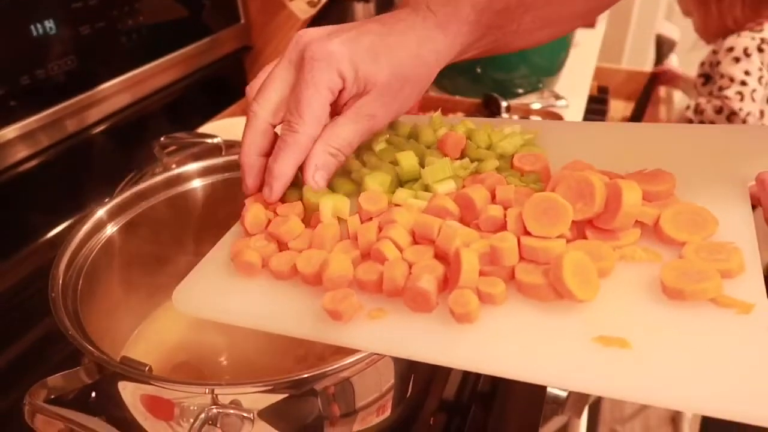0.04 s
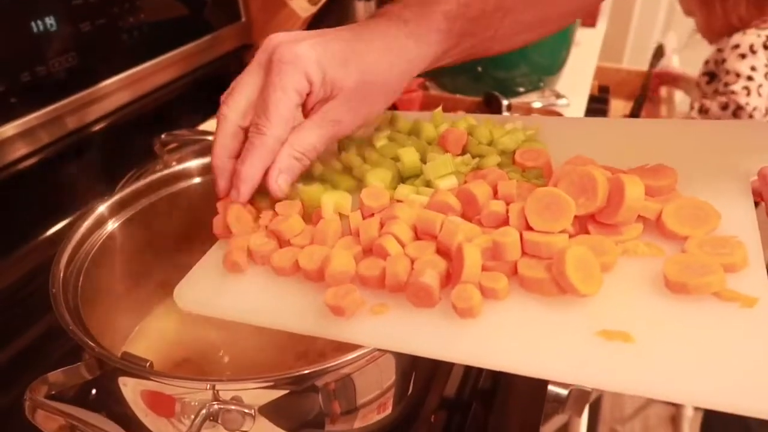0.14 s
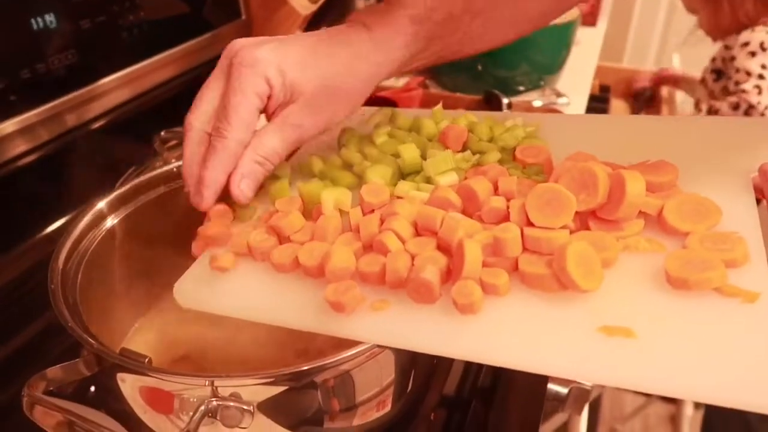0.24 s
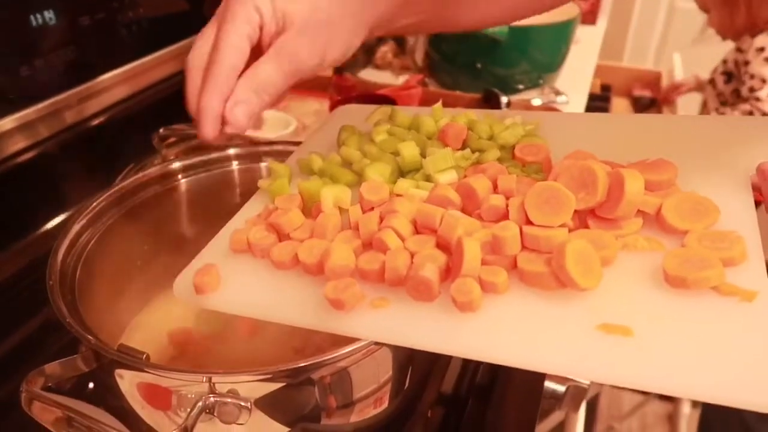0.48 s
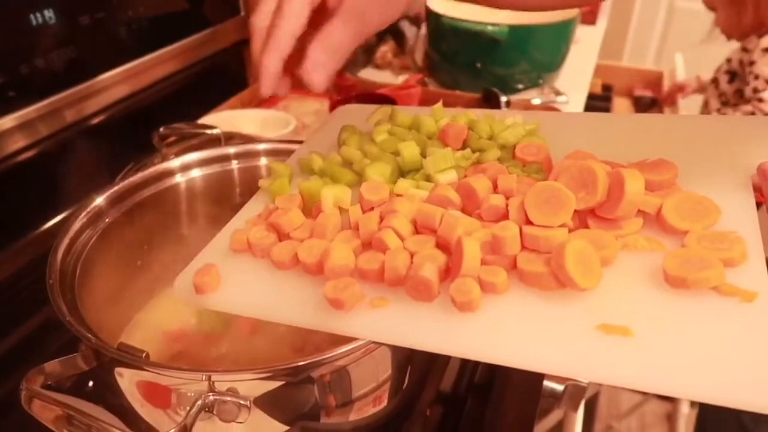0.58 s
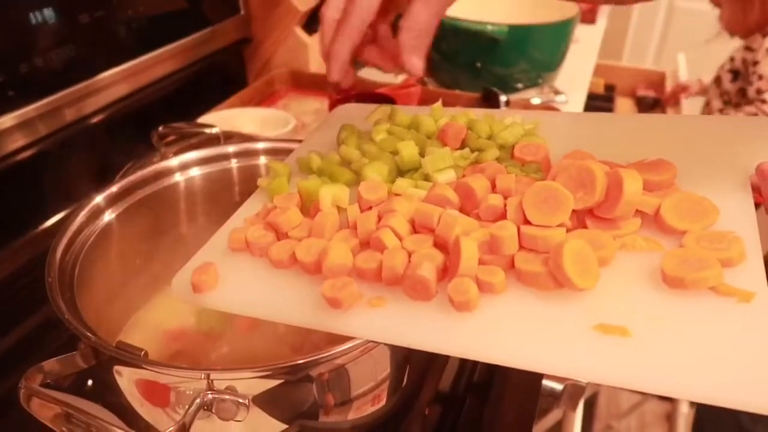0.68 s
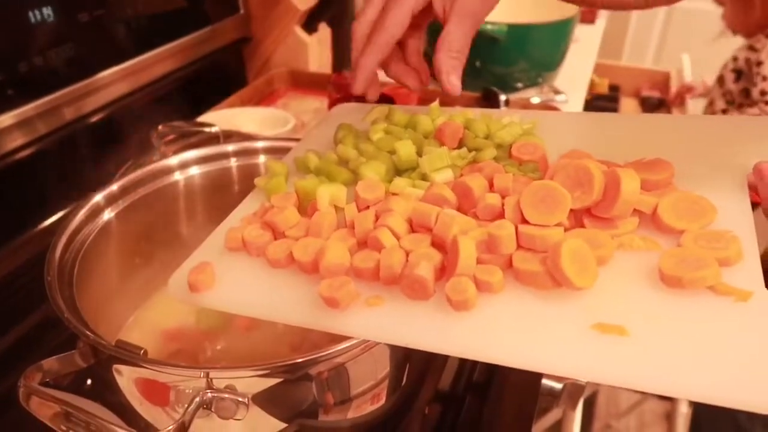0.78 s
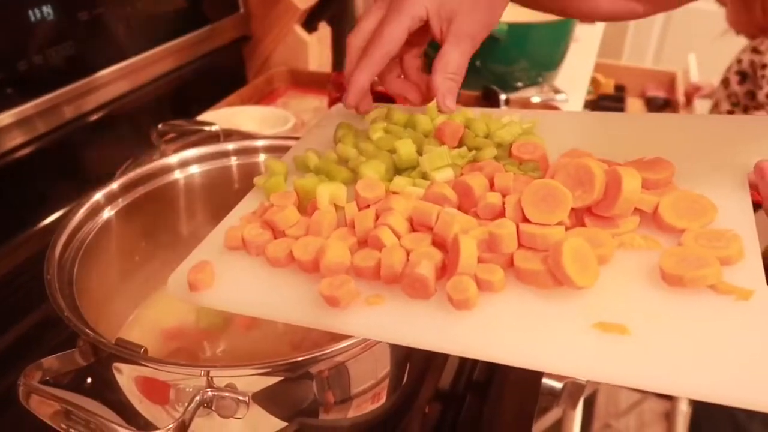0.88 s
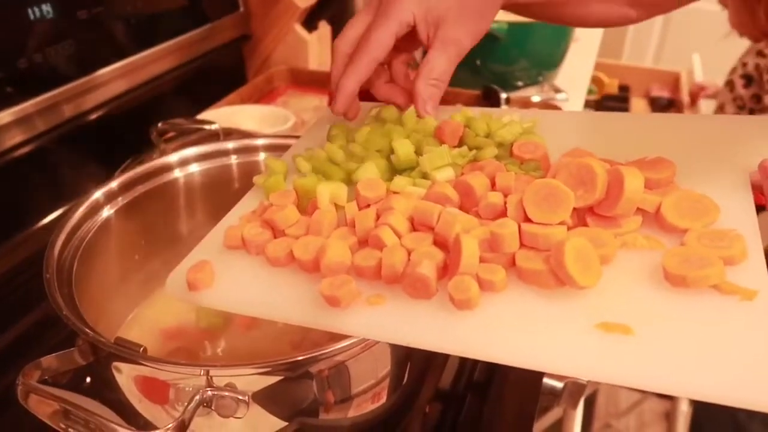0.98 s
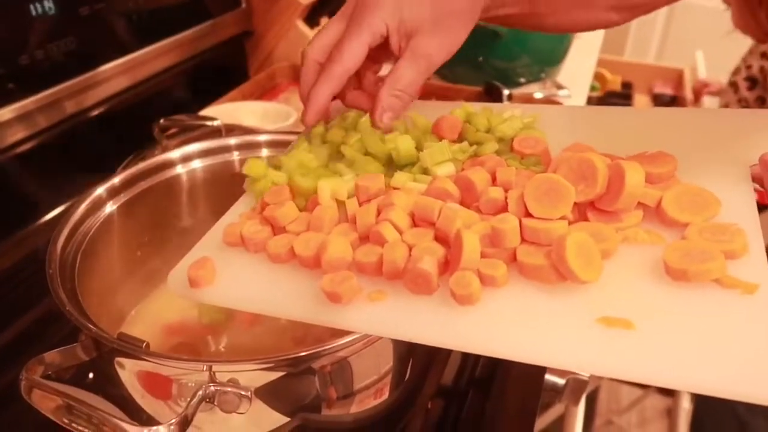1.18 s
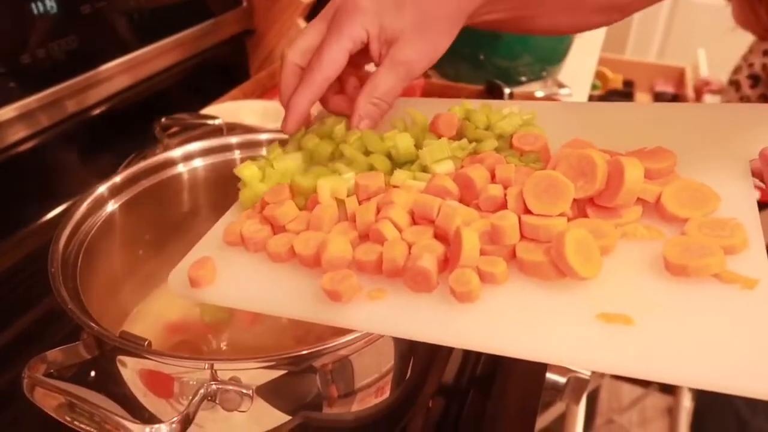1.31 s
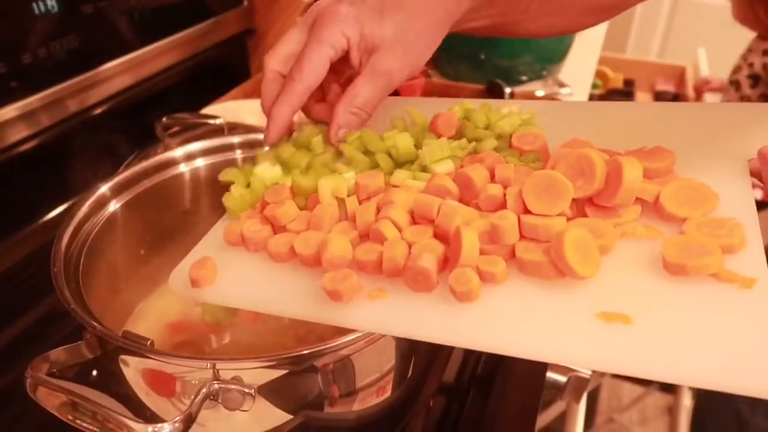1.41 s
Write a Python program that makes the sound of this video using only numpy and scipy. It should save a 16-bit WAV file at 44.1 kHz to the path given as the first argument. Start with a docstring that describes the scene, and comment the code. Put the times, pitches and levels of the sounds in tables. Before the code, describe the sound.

A loud hard knock in a steel pot as chopped vegetables are scraped along a plastic board

```python
"""A large piece of vegetable knocks loudly in a steel pot: damped modes, a noisy crack and a room echo, overloaded.
Fingers push chopped carrot and celery along a plastic cutting board held over the pot: clumped noise
through the board's resonances gives the rubbing, decaying sine blips the tumbling pieces.
Dull noise bumps of the hand, faint ticks of moist pieces and the ring of the stove top join in,
over shaped noise for the kitchen air and two sines for a low hum."""
import sys
import numpy as np
from scipy import signal
from scipy.fft import rfft, irfft, next_fast_len
from scipy.io import wavfile
from scipy.ndimage import map_coordinates

SR = 44100
rng = np.random.default_rng(int(sys.argv[2]) if len(sys.argv) > 2 else 0)


def transcribe(signal):
    """Save signal, clipped to [-1, 1], as a 16-bit WAV file at the path in sys.argv[1]."""
    frames = np.atleast_2d(signal).T
    limited = np.clip(frames, -1, 1)
    pcm = np.round(limited * 32767).astype(np.int16)
    wavfile.write(sys.argv[1], SR, pcm)


N = 63945  # length in samples

# Spectrum of the kitchen air. Each row: frequency in Hz, relative density in dB per Hz.
AIR_SPECTRUM = [(20, -8), (60, -3), (120, -2), (230, -2), (480, -3), (850, -15), (1060, -8), (1450, -15),
                (2200, -16), (5000, -29.5), (10000, -44), (16000, -68)]
# Stereo difference in the air. Each row: frequency in Hz, side gain in dB.
AIR_SIDE_GAIN = [(30, -13), (120, -11.5), (500, -3.5), (2000, -3), (8000, 6)]
# Steady tones of the hum. Each row: frequency in Hz, rms level in dB.
HUM_TONES = [(60, -69), (122, -64.5)]
AIR_DB = -57.5

# Reverberation of the kitchen. Each row: frequency in Hz, decay time t60 in s.
ROOM_DECAY = [(100, .45), (500, .48), (1500, .45), (4000, .39), (8000, .29), (14000, .18)]
# Stereo difference in the echo. Each row: frequency in Hz, side gain in dB.
ROOM_SIDE_GAIN = [(100, -20), (300, -20), (1000, -23), (2000, -22.5), (4000, -4), (10000, -2)]
ROOM_BUILD_S = 0.00061
POT_WET_DB, RING_WET_DB, BOARD_WET_DB = -5, -42, -9  # sends of the sources into the room

# Dull bumps of the hand on the board. Each row: start in seconds, level in dB.
HAND_BUMPS = [(.012, -40.5), (.054, -36.5), (.095, -36.5), (.135, -41), (.272, -33), (.385, -43.5),
              (.83, -46), (1.22, -47), (1.27, -50), (1.335, -45.5), (1.41, -45)]
# Spectrum of a bump. Each row: frequency in Hz, relative gain in dB.
BUMP_SPECTRUM = [(30, -18), (70, -7), (115, 8.5), (170, -11.5), (330, -15), (700, -21), (3000, -48.5)]
BUMP_T60_S, BUMP_ATTACK_S = 0.11, 0.0029

# Wet ticks of pieces coming unstuck. Each row: start in seconds, level in dB, pitch in Hz.
WET_TICKS = [(.006, -37.5, 3200), (.583, -67, 4900), (0.765, -60.5, 5266), (.834, -63.5, 4800),
             (.904, -58, 5160), (.911, -55, 3000), (0.914, -48.5, 1700), (1.006, -56, 8000)]
TICK_T60_S, TICK_ATTACK_S, TICK_WIDTH_OCT = 0.03, 0.00081, 0.25

# Resonances of the board. Each row: centre in Hz, width in Hz, relative gain in dB.
BOARD_RESONANCES = [(109, 41, -6.5), (228, 154, -1.5), (493, 243, -3), (665, 160, -9), (870, 1600, -16.5),
                    (1065, 165, -2.5), (1670, 480, -14), (2210, 310, -17), (3400, 1920, -26),
                    (6330, 8700, -35)]
# Sliding of the heap. Each row: time in seconds, drive level in dB.
SLIDE_LEVEL = [(0, -37), (.07, -43.5), (.16, -43), (.23, -40), (0.352, -47), (0.599, -54.5), (0.719, -53),
               (.8, -55), (.95, -53.5), (1.1, -52.5), (1.2, -53.5), (1.32, -50), (1.45, -50)]
# Pieces tumbling on the board. Each row: start in seconds, level in dB before TUMBLE_DB, pitch in Hz.
TUMBLING_PIECES = [(.001, -31.5, 807), (.005, -29.5, 1206), (.012, -29, 912), (0.021, -35, 767),
                   (0.055, -35, 293), (0.137, -48, 986), (0.196, -31.5, 445), (0.199, -36.5, 1082),
                   (.847, -48, 1120), (0.888, -46, 1054), (0.939, -48, 1065), (0.977, -47, 1130),
                   (1.031, -39.5, 525), (1.04, -49, 1116), (1.062, -41, 473), (1.11, -44.5, 1140),
                   (1.111, -53, 1712), (1.157, -49.5, 1050), (1.218, -43, 500), (1.254, -42, 1106),
                   (1.262, -40, 453), (1.2651, -44, 1080), (1.304, -49.5, 1608), (1.323, -46, 1070),
                   (1.336, -42.5, 490), (1.344, -52.5, 1670), (1.404, -51, 1690), (1.405, -40.5, 437),
                   (1.412, -38.5, 543), (1.426, -41, 403), (1.435, -38.5, 476), (1.44, -44.5, 1096)]
SLIP_SPREAD, SLIP_CLUMP_DB, SLIP_CLUMPS_PER_S = 0.5, 2.2, 75
TUMBLE_DB, TUMBLE_T60_S, TUMBLE_ATTACK_S = 4.5, 0.052, 0.0016
TUMBLE_RUB_DB = -20.5  # noise force relative to the blip's envelope

# Modes of the stove top under the pot. Each row: frequency in Hz, relative level in dB, t60 in s.
STOVE_MODES = [(280.7, -28, 0.48), (486, -29.5, 0.41), (624.4, -27.5, 0.54), (655, -39.5, 0.52),
               (785.4, -28.5, 0.48), (1019, -37.5, 0.75), (1095, -28, 0.12), (1352, -25, 0.44),
               (1578, -41, 0.45), (2310, -45, 0.88)]
# Blended radiation of the pot into the room. Each row: frequency in Hz, relative gain in dB.
POT_RADIATION = [(60, -29), (180, -21), (290, -6), (620, -1), (900, -1.5), (1400, -3), (2000, -6.5),
                 (2900, -14.5), (4200, -21), (8000, -33), (9500, -46), (15000, -66)]
RADIATED_DB = 31.5

# Contacts with the pot: a soft piece, then the graze, blow and dying rebounds of a large one.
# Each row: start in seconds, level in dB, sharp crack in dB relative to that level.
POT_CONTACTS = [(.001, -29, -6), (0.2427, -22, 1), (0.2487, 0, 22), (0.2548, -15, -3), (0.2576, -15, 22),
                (.2662, -21, 16), (.2805, -26.5, 6), (.349, -31.5, -6)]
# Modes of the pot, damped by its contents. Each row: frequency in Hz, relative level in dB, t60 in s.
POT_MODES = [(358, -19, 0.057), (495, -9.5, 0.066), (690, -11.5, 0.064), (733, -7.5, 0.11), (836, 3, 0.028),
             (980, 2.8, 0.019), (1151, -8, .07), (1272, -1, 0.028), (1567, 1.5, 0.025), (1691, -5, 0.05),
             (1782, 0, 0.017), (1977, -5, 0.036), (2240, -11, 0.025), (2710, -18, 0.072)]
# Spectrum of crack and spatter. Each row: frequency in Hz, gain in dB.
CONTACT_SPECTRUM = [(30, -14), (120, -13), (500, -4), (1800, 0), (3000, -3.5), (5000, -1.5), (8000, -8.5),
                    (9200, -24), (12000, -33), (16000, -58)]
POT_ATTACK_S = 0.0004
SPATTER_DB, SPATTER_T60_S = -3.5, 0.021
THUMP_DB, THUMP_S = -7, 0.0008

POT_LEAD_MS, BOARD_LEAD_MS = -0.02, 0.04  # how much sooner the left microphone port hears each
CLIP_TOP, TOP_HZ = 1.0, 16200  # overload ceiling (full scale = 1), band limit in Hz


def amp(db):
    """The decibel law: 20 dB is a tenfold gain."""
    return 10 ** (np.asarray(db) / 20)


def unit(x):
    """Normalisation to unit rms."""
    return x / np.sqrt(np.mean(x ** 2) + 1e-20)


def along(points, hz):
    """Interpolation of (Hz, value) points on a logarithmic frequency axis."""
    f, value = np.transpose(points)
    return np.interp(np.log(hz + 1), np.log(f + 1), value)


def since(s):
    """Elapsed time: seconds since time s, zero before it."""
    return np.maximum(np.arange(N) / SR - s, 0)


def fade(t, t60):
    """Exponential decay: 60 dB lost in each t60 from t = 0."""
    return (t >= 0) * np.exp(-np.log(1000) * np.maximum(t, 0) / t60)


def bursts(events, t60, attack):
    """Superposed envelopes of (s, dB) events that rise quickly and decay exponentially."""
    envelope = np.zeros(N)
    for s, db in events:
        t = since(s)
        envelope += amp(db) * fade(t, t60) * (1 - np.exp(-t / attack))
    return envelope


def ring(modes, t):
    """Modal superposition: damped sines (Hz, dB, t60 s) struck at t = 0."""
    return sum(amp(db) * fade(t, t60) * np.sin(2 * np.pi * hz * t) for hz, db, t60 in modes)


def filtered(x, response):
    """Linear filtering: the spectrum of x times a complex response of frequency."""
    m = 2 * next_fast_len(N // 2 + SR // 8, True)  # zero padding leaves room for the filter's tail
    hz = np.fft.rfftfreq(m, 1 / SR)
    return irfft(rfft(x, m) * response(hz), m)[..., :N]


def causal(gain):
    """Minimum phase from gain alone, by folding the real cepstrum."""
    cepstrum = irfft(np.log(gain + 1e-6))
    half = len(cepstrum) // 2
    folded = np.concatenate([cepstrum[:1], 2 * cepstrum[1:half], np.zeros(half)])
    return np.exp(rfft(folded))


def coloured(x, points):
    """Causal spectral shaping through (Hz, dB) points."""
    return filtered(x, lambda hz: causal(amp(along(points, hz))))


def ports(x, lead_ms):
    """Interaural-style delay: sound reaches two close microphone ports slightly out of step."""
    halves = np.array([[1], [-1]])  # left advanced, right delayed by half the lead
    return filtered(x, lambda hz: np.exp(1j * np.pi * hz * lead_ms / 1000 * halves))


def background():
    """Stationary sound: shaped noise of the kitchen air and the steady sines of a low hum."""
    t = np.arange(N) / SR
    mid, side = unit(coloured(rng.standard_normal((2, N)), AIR_SPECTRUM))
    side = coloured(side, AIR_SIDE_GAIN)
    hum = sum(np.sqrt(2) * amp(db) * np.sin(2 * np.pi * (hz * t + rng.random())) for hz, db in HUM_TONES)
    return amp(AIR_DB) * np.array([mid + side, mid - side]) + hum


def kitchen(x):
    """Diffuse reverberation: convolution with a stereo noise tail whose treble dies first."""
    hz, t, bins = signal.stft(rng.standard_normal((2, N)), SR, nperseg=256)
    decay = fade(t, along(ROOM_DECAY, hz)[:, None])
    build = 1 - np.exp(-t / ROOM_BUILD_S)
    tail = signal.istft(bins * decay * build, SR)[1][:, :N]
    tail = tail / np.linalg.norm(tail[0])
    mid, side = signal.fftconvolve(x[None], tail, axes=1)[:, :N]
    side = coloured(side, ROOM_SIDE_GAIN)
    return np.array([mid + side, mid - side])


def hand():
    """Heavily damped impact: the hand nudges the board in low noise thuds without ring."""
    thud = unit(coloured(rng.standard_normal(N), BUMP_SPECTRUM))
    return bursts(HAND_BUMPS, BUMP_T60_S, BUMP_ATTACK_S) * thud


def ticks():
    """Sudden release of adhesion: moist cut faces part in faint ticks of narrow-band noise."""
    out = np.zeros(N)
    for s, db, pitch in WET_TICKS:
        def band(hz):
            """Gaussian selectivity in octaves about the pitch."""
            return np.exp(-0.5 * (np.log2((hz + 1) / pitch) / TICK_WIDTH_OCT) ** 2)
        fizz = unit(filtered(rng.standard_normal(N), band))
        out += bursts([(s, db)], TICK_T60_S, TICK_ATTACK_S) * fizz
    return out


def board_response(hz):
    """Resonance: power sum of the board's broad, steep-sided peaks, scaled to unit power gain."""
    power = np.zeros(len(hz))
    for centre, width, db in BOARD_RESONANCES:
        damping = (hz * width) ** 2
        peak = damping / ((centre ** 2 - hz ** 2) ** 2 + damping)
        power += (amp(db) * peak) ** 2
    return causal(unit(np.sqrt(power)))


def board():
    """Frictional excitation: clumped slips and brief rubs drive the board; pitched blips add to it."""
    t = np.arange(N) / SR
    knots = rng.standard_normal(int(t[-1] * SLIP_CLUMPS_PER_S) + 2)
    clumps = map_coordinates(knots, [t * SLIP_CLUMPS_PER_S])  # smooth random level
    spread = np.exp(SLIP_SPREAD * rng.standard_normal(N))  # uneven slip sizes
    slips = unit(rng.standard_normal(N) * spread * amp(SLIP_CLUMP_DB * clumps))
    force = slips * amp(np.interp(t, *np.transpose(SLIDE_LEVEL)))
    blips = np.zeros(N)
    for s, db, hz in TUMBLING_PIECES:
        touch = bursts([(s, db + TUMBLE_DB)], TUMBLE_T60_S, TUMBLE_ATTACK_S)
        blips += touch * np.sin(2 * np.pi * hz * since(s))
        force += amp(TUMBLE_RUB_DB) * touch * rng.standard_normal(N)
    return filtered(force, board_response) + blips


def hardest_blow():
    """The strongest excitation: the contact of highest level."""
    return max(POT_CONTACTS, key=lambda row: row[1])


def stove():
    """Structure-borne sound: the hardest blow sets the stove top's modes ringing."""
    s, db, _ = hardest_blow()
    return amp(db) * ring(STOVE_MODES, since(s))


def pot_radiation():
    """Impulse radiation: the hardest blow sends a broad, blended knock into the room."""
    s, db, _ = hardest_blow()
    blow = np.zeros(N)
    blow[round(s * SR)] = amp(db + RADIATED_DB)
    return coloured(blow, POT_RADIATION)


def pot():
    """Impact excitation: a crack, a low push and a brief spatter accompany the pot's damped modes."""
    body, contact = np.zeros(N), np.zeros(N)
    for s, db, crack_db in POT_CONTACTS:
        t = since(s)
        body += amp(db) * ring(POT_MODES, t) * (1 - np.exp(-t / POT_ATTACK_S))
        body -= amp(db + THUMP_DB) * t / THUMP_S * np.exp(-t / THUMP_S)  # low push
        spatter = (t > 0) * fade(t, SPATTER_T60_S) * rng.standard_normal(N)
        contact += amp(db + SPATTER_DB) * spatter
        contact[round(s * SR)] += amp(db + crack_db)
    return body + coloured(contact, CONTACT_SPECTRUM)


def scene():
    """Superposition of direct and reverberant sound: pot and board close by, the kitchen around."""
    knock = pot() + stove()
    rustle = board() + hand() + ticks()
    into_room = amp(POT_WET_DB) * pot_radiation() + amp(RING_WET_DB) * knock
    pot_sound = ports(knock, POT_LEAD_MS) + kitchen(into_room)
    board_echo = amp(BOARD_WET_DB) * kitchen(rustle)
    return pot_sound + ports(rustle + background(), BOARD_LEAD_MS) + board_echo


def record(dry):
    """Saturation and band limiting: peaks flatten towards the ceiling, then the top is cut."""
    clipped = dry / (1 + abs(dry / CLIP_TOP) ** 6) ** (1 / 6)
    return filtered(clipped, lambda hz: hz < TOP_HZ)


dry = scene()
out = record(dry)
transcribe(out)
```